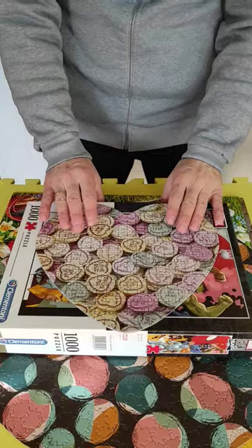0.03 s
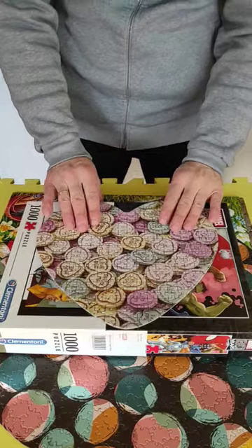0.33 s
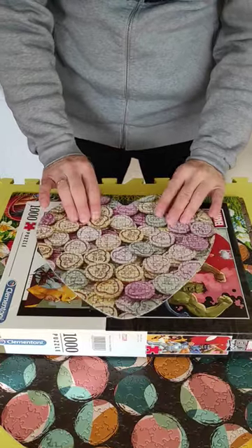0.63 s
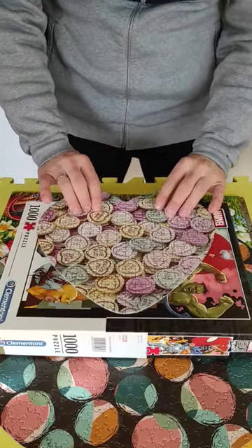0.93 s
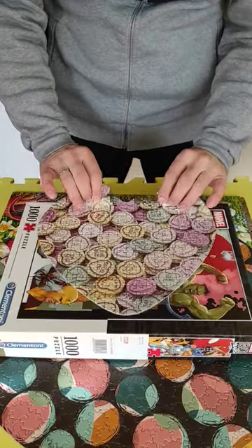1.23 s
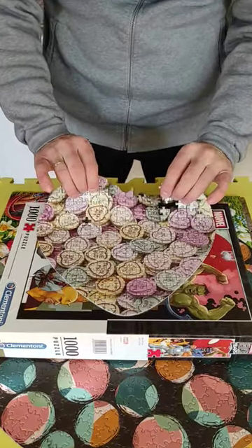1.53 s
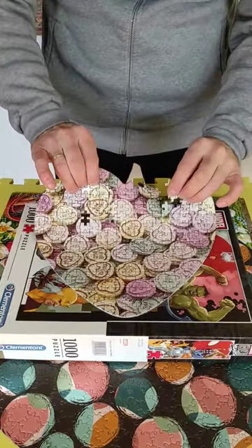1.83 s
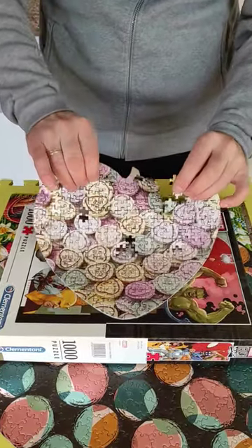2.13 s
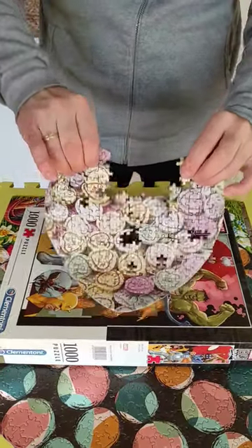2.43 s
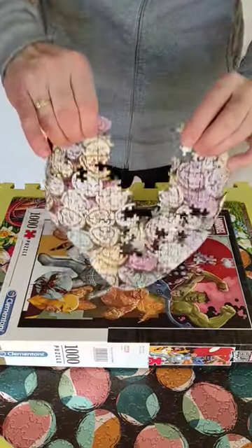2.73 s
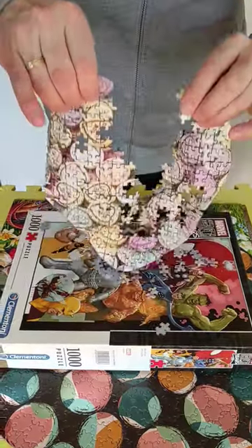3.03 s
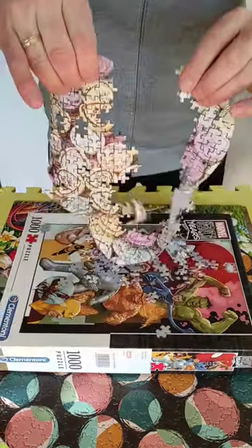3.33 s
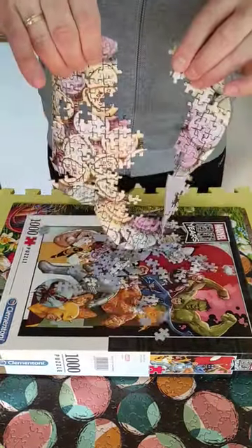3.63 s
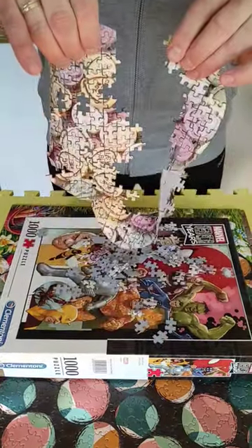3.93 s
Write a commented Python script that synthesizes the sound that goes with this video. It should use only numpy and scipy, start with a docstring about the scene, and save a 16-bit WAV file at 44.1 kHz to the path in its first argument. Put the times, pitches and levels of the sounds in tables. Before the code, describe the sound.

Cardboard jigsaw pieces break loose and clatter onto a hollow box after a few light clicks.

```python
"""A small, bare room: a finished cardboard jigsaw is lifted off its box. A hand presses on the lid,
card rubs on card and the joints click as the sheet bends. Then it tears, and pieces and clumps clatter
onto the hollow lid. Each landing is an edge tick, a short clack of the card and a thump of the lid's
modes. The room answers the contacts, over a low rumble and a soft hiss that swells early, then fades."""
import sys
import numpy as np
from scipy import signal
from scipy.fft import rfft, irfft, next_fast_len
from scipy.io import wavfile
from scipy.ndimage import uniform_filter1d

SR = 44100
rng = np.random.default_rng(int(sys.argv[2]) if len(sys.argv) > 2 else 0)


def to_wav(sig):
    """Store sig (one row per channel, or 1-D mono) as 16-bit WAV at the path in sys.argv[1].

    Samples outside -1..1 are clipped; the rate is SR.
    """
    pcm = np.clip(np.atleast_2d(sig), -1, 1) * 32767
    pcm = np.round(pcm).astype(np.int16)
    wavfile.write(sys.argv[1], SR, pcm.T)  # frames by channels


N = 176400
EVENT_N = 32768  # samples per event buffer

# room decay (frequency [Hz], T60 [s])
ROOM_T60_S = [(200, 0.46), (1800, 0.47), (7500, 0.34)]
# room tail re direct sound (frequency [Hz], gain [dB])
ROOM_GAIN_DB = [(100, 0.5), (300, -4), (700, 1.5), (2000, -2.5), (6500, 1.5), (14000, -6)]
# diffuse sound, left to right (frequency [Hz], coherence [-])
DIFFUSE_COHERENCE = [(100, 0.45), (300, 0.75), (700, 0.3), (1400, 0), (4000, 0)]
# direct sound, left to right (frequency [Hz], coherence [-])
DIRECT_COHERENCE = [(500, 0.72), (6000, 0.12)]
# left microphone re right (frequency [Hz], level [dB])
BALANCE_DB = [(60, 5.5), (200, 10.5), (700, 6.7), (1300, 10.4), (2400, 3.8), (4400, 2.05)]
# rumble spectrum (frequency [Hz], level [dB])
RUMBLE_SPECTRUM = [(40, -10.5), (66, 0.5), (85, -3), (125, -13), (160, 0.5), (205, -3.5), (258, -0.5),
                   (370, -12), (600, -20.5), (1500, -30), (4000, -40), (8000, -39.5), (11000, -51.5)]
# opening gain on rumble and hiss (time [s], gain [dB])
FADE_IN_DB = [(.1, -45), (.118, -8), (.22, 1.5), (.33, 7.5)]
# background hiss spectrum (frequency [Hz], level [dB])
HISS_SPECTRUM = [(150, -4), (600, 7), (1200, -3.5), (2200, -3), (3200, -11), (5500, -12), (7500, -6.5),
                 (9000, -12), (10400, -28)]
# hiss envelope before the opening gain (time [s], level [dB])
HISS_DB = [(.28, -83.5), (.35, -71.5), (.7, -65.5), (.88, -68.5), (1.1, -78), (2.1, -84.5)]
# hollow box modes (frequency [Hz], level [dB], T60 [s])
LID_MODES = [(157.9, -3.5, 0.26), (203.8, 2, 0.14), (233.5, 0.5, 0.099), (293.3, 3.5, 0.05),
             (345, 3, 0.071), (499.7, -7.5, 0.081)]
# card rubbing past card (time [s], rise [s], level [dB], resonance [Hz])
RUBS = [(.81, 0.029, -56, 1130), (1.828, 0.015, -53.5, 975)]
# joint clack and rub spectrum (frequency [Hz], level [dB])
JOINT_SPECTRUM = [(250, -14), (700, 1.5), (1300, 3), (2050, 0.5), (2700, -2.5), (4200, -16), (6000, -25),
                  (10000, -52)]
# joint tick spectrum (frequency [Hz], level [dB])
JOINT_TICK_SPECTRUM = [(1000, -17), (4000, 8.5), (5500, -12), (7400, -5), (8900, -4.5), (10300, -37)]
# joints clicking (time [s], clack [dB], tick [dB])
JOINT_CLICKS = [(1.363, -54, -74), (1.489, -39.5, -51.5), (1.508, -39.5, -59), (1.559, -54, -62.5),
                (1.7032, -42.5, -71)]
# upper modes of a piece (frequency [Hz], level [dB], T60 [s])
CARD_MODES = [(1290, -39, 0.059), (1915, 8, 0.035)]
# landing clack spectrum (frequency [Hz], level [dB])
CLACK_SPECTRUM = [(130, -29.5), (400, -1.5), (800, 0), (1400, -1.5), (2000, 1), (2700, -0.5), (3300, -6.5),
                  (5000, -5), (9000, -77.5)]
# landing edge tick spectrum (frequency [Hz], level [dB])
TICK_SPECTRUM = [(500, -5), (2000, -2), (4000, 0), (6000, 0.5), (7600, 4.5), (8900, 0.5), (9900, -17.5),
                 (12000, -16.5), (16000, -29.5)]
# pieces and clumps landing (time [s], thump [dB], clack [dB], tick [dB], knock [Hz])
LID_HITS = [(2.379, -42.5, -38.5, -57, 1306), (2.398, -34.5, -33.5, -52, 550),
            (2.4337, -40.5, -33.5, -45.5, 816), (2.481, -39, -40, -54.5, 670),
            (2.5671, -40, -34.5, -45.5, 533), (2.594, -32.5, -25.5, -41.5, 715),
            (2.616, -19, -20.5, -31, 630), (2.627, -17, -23, -33.5, 685), (2.6456, -25.5, -21.5, -30, 900),
            (2.656, -23, -22, -30.5, 1050), (2.670, -54, -19, -26, 840), (2.679, -22, -20.5, -22.5, 817),
            (2.697, -23, -21, -29, 950), (2.768, -24.5, -29.5, -29, 1350), (2.830, -28.5, -25, -56, 1378),
            (2.8346, -28, -20.5, -33, 1207), (2.8983, -39, -25, -28.5, 590), (2.919, -32, -28, -62, 770),
            (2.993, -35, -42, -37.5, 1210), (3.046, -40, -24, -37, 810), (3.065, -32, -24.5, -21, 864),
            (3.0831, -28, -25, -22.5, 564), (3.085, -20.5, -17.5, -23, 644), (3.265, -39, -32.5, -46, 561),
            (3.3351, -17, -19.5, -23, 620), (3.3631, -26, -24.5, -36, 1280),
            (3.3765, -20.5, -26, -31.5, 877), (3.451, -41, -38, -59, 596), (3.5072, -22.5, -16, -28.5, 935),
            (3.5792, -20.5, -23.5, -25, 935), (3.598, -20, -24, -34, 910),
            (3.612, -17.5, -22.5, -24.5, 1400), (3.675, -37, -31, -36, 1090), (3.777, -74, -34.5, -36, 940),
            (3.941, -27, -26, -32.5, 777), (3.952, -27, -27, -41, 980)]
# loose pieces skittering (start [s], length [s], mean clack [dB])
SKITTER_RUNS = [(2.65, .12, -33.5), (2.775, .19, -35), (2.966, .08, -38), (3.15, .1, -48.5),
                (3.35, .11, -43), (3.61, .12, -37), (3.755, .1, -47.5)]

ROOM_BUILD_S, RUMBLE_BASE_DB, HISS_GRAIN_DB = 0.0044, -63.5, 1
PRESS_S, PRESS_DB = .352, -49.5
CLACK_T60_S, SETTLE_S = 0.028, .0012  # the card's face lands just after its edge
TICK_T60_S, CHATTER_T60_S, CHATTER_DB = .005, 0.05, -14
JOINT_HZ, JOINT_RING_DB = 1855, -4  # knock of a piece snapping free
CARD_SCATTER, CARD_RING_DB = 0.053, -7  # relative pitch spread; ring re rattle
KNOCK_DB, KNOCK_T60_S = -0.5, 0.013  # lowest bending mode, its pitch set by clump size
DULL_RATIO = 3.23  # clack cutoff / knock frequency
SKITTER_PER_S, SKITTER_KNOCK_HZ, SKITTER_SPREAD_DB = 95, 811, 2.5
SKITTER_THUMP_DB, SKITTER_TICK_DB = -4.5, -8  # re clack
PORT_LEFT_HZ, PORT_RIGHT_HZ, PORT_HALF_WIDTH_HZ, PORT_DB = 8660, 7240, 610, 6.5
TRIM_DB, TOP_HZ = -2.5, 16300


def amp(db):
    return 10 ** (np.asarray(db) / 20)


def along(points, hz):
    """Interpolate (frequency [Hz], value) on a log axis."""
    point_hz, values = np.transpose(points)
    return np.interp(np.log(hz + 1), np.log(point_hz + 1), values)


def curve(points):
    """Interpolate (time [s], value) per sample."""
    return np.interp(np.arange(N) / SR, *np.transpose(points))


def decay(t, t60_s):
    return np.exp(-np.log(1000) * t / t60_s)


def normalised(x):
    """Scale to the energy of 4 ms at rms 1."""
    return x * np.sqrt(.004 * SR / np.mean(np.sum(x ** 2, axis=-1)))


def min_phase(points):
    """Minimum-phase response through (frequency [Hz], level [dB])."""
    cepstrum = irfft(np.log(amp(along(points, np.fft.rfftfreq(EVENT_N, 1 / SR)))))
    cepstrum[1:EVENT_N // 2] *= 2
    cepstrum[EVENT_N // 2 + 1:] = 0
    return np.exp(rfft(cepstrum))


def filtered(x, response):
    """Apply the gain response(hz)."""
    size = next_fast_len(N + EVENT_N)
    return irfft(rfft(x, size) * response(np.fft.rfftfreq(size, 1 / SR)), size)[..., :N]


def stereo(pair, coherence):
    """Mix two independent spectra to left and right of given coherence."""
    hz = np.linspace(0, SR / 2, pair.shape[1])
    angle = np.arccos(np.clip(along(coherence, hz), -1, 1)) / 2
    mid, side = pair[0] * np.cos(angle), pair[1] * np.sin(angle)
    return np.array([mid + side, mid - side])


def add(out, start_s, x):
    part = out[:, int(start_s * SR):][:, :x.shape[1]]
    part += x[:, :part.shape[1]]


def diffuse_noise(spectrum):
    """Stereo noise, rms 1."""
    white = irfft(stereo(rfft(rng.standard_normal((2, N))), DIFFUSE_COHERENCE), N)
    shaped = filtered(white, lambda hz: amp(along(spectrum, hz)))
    return shaped / shaped.std()


def ring(modes, scatter, spread_db=3, rise_cycles=1e-9):
    """Damped modes; strength and pitch vary at random, as with the strike point."""
    t = np.arange(EVENT_N) / SR
    out = np.zeros(EVENT_N)
    for hz, db, t60_s in modes:
        gain = rng.choice([-1, 1]) * amp(db + spread_db * rng.normal())
        envelope = decay(t, t60_s) * (1 - np.exp(-t * hz / rise_cycles))
        struck_hz = hz * (1 + scatter * rng.normal())
        out += gain * envelope * np.sin(2 * np.pi * struck_hz * t)
    return normalised(out)


def crunch(envelope, colour):
    """Noise burst of card on card."""
    spectra = rfft(rng.standard_normal((2, EVENT_N)) * envelope)
    return normalised(irfft(stereo(spectra, DIRECT_COHERENCE) * colour))


def all_round(x):
    """Spectrum of a blow over all directions: narrow treble peaks even out."""
    cumulative = np.cumsum(np.mean(abs(rfft(x)) ** 2, axis=0))
    hz = np.fft.rfftfreq(EVENT_N, 1 / SR)
    half_hz = 2 + hz ** 2 / (hz + 1200) / 10
    band_power = np.interp(hz + half_hz, hz, cumulative) - np.interp(hz - half_hz, hz, cumulative)
    bin_power = band_power * hz[1] / (2 * half_hz)
    return min_phase(np.column_stack([hz, 10 * np.log10(bin_power + 1e-20)]))


def in_room(x, single_blow=False):
    """Direct sound plus a fresh diffuse tail; treble dies first."""
    source = all_round(x) if single_blow else rfft(x[0])
    hz, t, noise = signal.stft(rng.standard_normal((2, EVENT_N)), SR, nperseg=256)
    t60_s = along(ROOM_T60_S, hz)[:, None]
    envelope = decay(t, t60_s) * (1 - np.exp(-t / ROOM_BUILD_S))
    energy_scale = np.sqrt(2 * np.log(1000) / (t60_s * SR))
    gain = amp(along(ROOM_GAIN_DB, hz))[:, None] * energy_scale
    tail = signal.istft(noise * envelope * gain, SR, nperseg=256)[1][:, :EVENT_N]
    return x + irfft(source * stereo(rfft(tail), DIFFUSE_COHERENCE))


def rumble():
    """Low room noise, fading in."""
    return amp(RUMBLE_BASE_DB + curve(FADE_IN_DB)) * diffuse_noise(RUMBLE_SPECTRUM)


def hiss():
    """Soft, slightly grainy background hiss: swells at the start, then fades."""
    grain = uniform_filter1d(rng.standard_normal(N), size=500)
    level_db = curve(HISS_DB) + curve(FADE_IN_DB) + HISS_GRAIN_DB * grain / grain.std()
    return amp(level_db) * diffuse_noise(HISS_SPECTRUM)


def lid_thump(db):
    """The lid flexes over the hollow box: modes swell, lowest last; little deep bass radiates."""
    lid = ring(LID_MODES, scatter=0.0091, rise_cycles=0.76)
    return amp(db) * signal.lfilter(*signal.butter(2, 135, "high", fs=SR), lid)


def press():
    """A hand presses softly on the lid."""
    out = np.zeros((2, N))
    add(out, PRESS_S, in_room(np.array([lid_thump(PRESS_DB)] * 2)))
    return out


def rubs():
    """Card slides on card, one broad resonance per rub."""
    out = np.zeros((2, N))
    for start_s, rise_s, db, hz in RUBS:
        age = np.arange(EVENT_N) / SR / rise_s
        friction = crunch(age * np.exp(-age), min_phase(JOINT_SPECTRUM))
        rub = signal.lfilter(*signal.iirpeak(hz, Q=2, fs=SR), friction)
        add(out, start_s, in_room(amp(db) * normalised(rub)))
    return out


def contact(clack_db, tick_db, clack_colour, tick_colour, ringing):
    """The edge ticks and chatters while the card settles, rattles and rings."""
    t = np.arange(EVENT_N) / SR
    rattle = crunch(decay(t, CLACK_T60_S), clack_colour)
    clack = normalised((rattle + ringing) * (1 - np.exp(-t / SETTLE_S)))
    tick = crunch(decay(t, TICK_T60_S) + amp(CHATTER_DB) * decay(t, CHATTER_T60_S), tick_colour)
    return amp(clack_db) * clack + amp(tick_db) * tick


def joints():
    """Interlocked pieces click as the sheet bends upward."""
    out = np.zeros((2, N))
    colours = min_phase(JOINT_SPECTRUM), min_phase(JOINT_TICK_SPECTRUM)
    for start_s, clack_db, tick_db in JOINT_CLICKS:
        knock = amp(JOINT_RING_DB) * ring([(JOINT_HZ, 0, KNOCK_T60_S)], CARD_SCATTER)
        click = contact(clack_db, tick_db, *colours, knock)
        add(out, start_s, in_room(click, single_blow=True))
    return out


def landing(thump_db, clack_db, tick_db, knock_hz, clack_colour, tick_colour):
    """One hit on the lid; a larger clump knocks lower and clacks duller."""
    lowpass = signal.butter(2, min(DULL_RATIO * knock_hz, SR / 2 - 1), fs=SR)
    dulled = clack_colour * signal.freqz(*lowpass, worN=EVENT_N // 2 + 1, include_nyquist=True)[1]
    upper = amp(CARD_RING_DB) * signal.lfilter(*lowpass, ring(CARD_MODES, CARD_SCATTER))
    knock = amp(KNOCK_DB) * ring([(knock_hz, 0, KNOCK_T60_S)], scatter=0)
    return contact(clack_db, tick_db, dulled, tick_colour, upper + knock) + lid_thump(thump_db)


def falling_pieces():
    """Pieces and clumps hit the lid; loose ones of mixed size skitter after."""
    out = np.zeros((2, N))
    colours = min_phase(CLACK_SPECTRUM), min_phase(TICK_SPECTRUM)
    for start_s, *strike in LID_HITS:
        add(out, start_s, in_room(landing(*strike, *colours), single_blow=True))
    for start_s, length_s, mean_db in SKITTER_RUNS:
        run = np.zeros((2, EVENT_N))
        for k in range(round(length_s * SKITTER_PER_S)):
            db = mean_db + SKITTER_SPREAD_DB * rng.normal()
            knock_hz = SKITTER_KNOCK_HZ * 2 ** rng.uniform(-1, 1)
            offset_s = (k + rng.random()) / SKITTER_PER_S
            piece = landing(db + SKITTER_THUMP_DB, db, db + SKITTER_TICK_DB, knock_hz, *colours)
            add(run, offset_s, piece)
        add(out, start_s, in_room(run))
    return out


def scene():
    return rumble() + hiss() + press() + rubs() + joints() + falling_pieces()


def record(dry):
    """Band-limited microphone pair: left louder, one resonance per port."""
    def response(hz):
        balance_db = np.outer([.5, -.5], along(BALANCE_DB, hz))
        detune = np.array([hz - PORT_LEFT_HZ, hz - PORT_RIGHT_HZ]) / PORT_HALF_WIDTH_HZ
        port_db = PORT_DB / (1 + detune ** 2)
        return amp(balance_db + port_db + TRIM_DB) * (hz < TOP_HZ)
    return filtered(dry, response)


dry = scene()
out = record(dry)
to_wav(out)
```